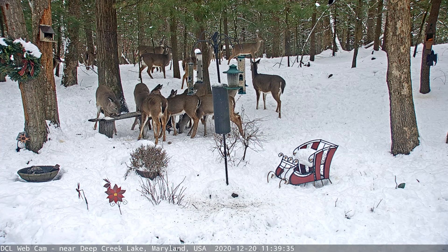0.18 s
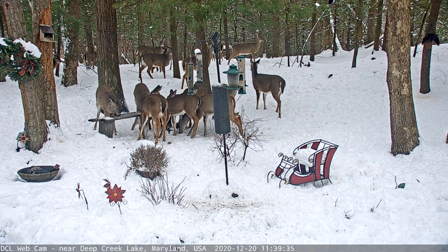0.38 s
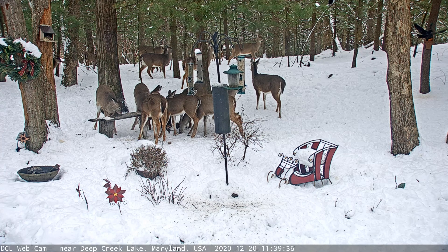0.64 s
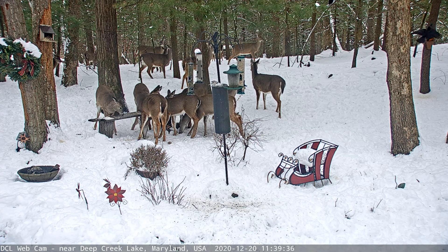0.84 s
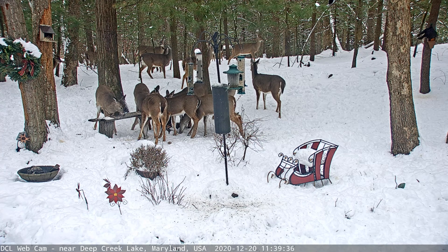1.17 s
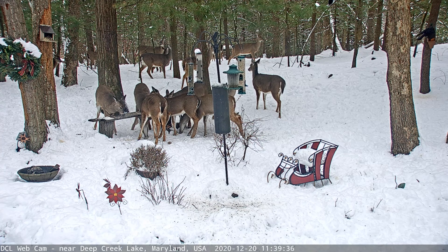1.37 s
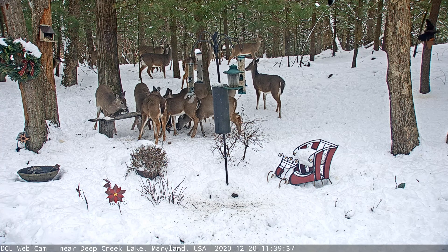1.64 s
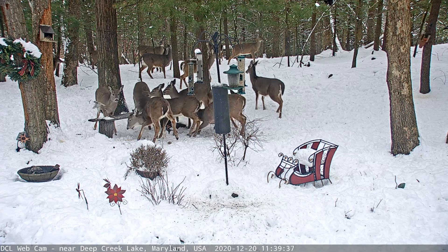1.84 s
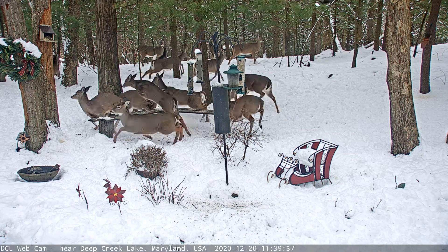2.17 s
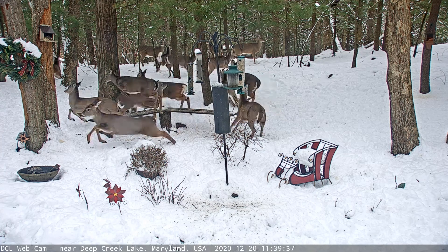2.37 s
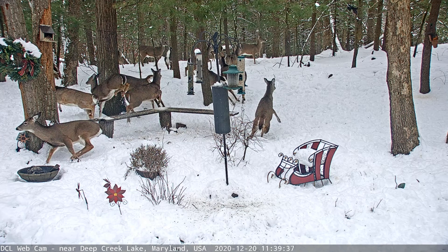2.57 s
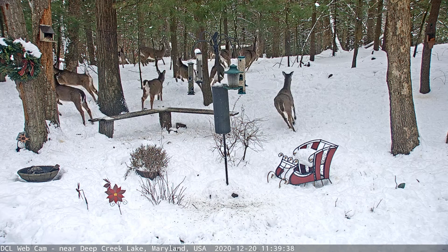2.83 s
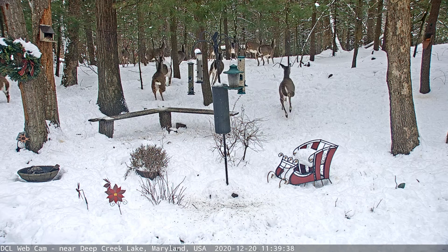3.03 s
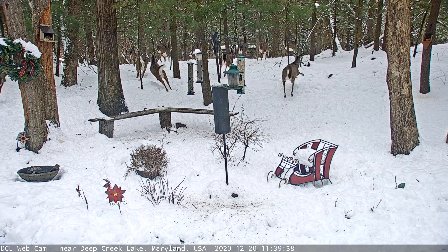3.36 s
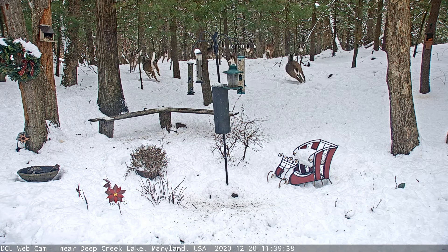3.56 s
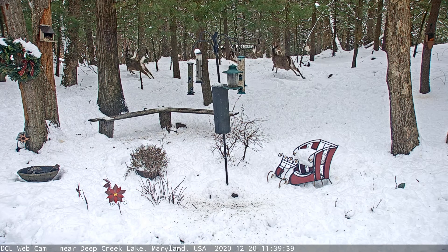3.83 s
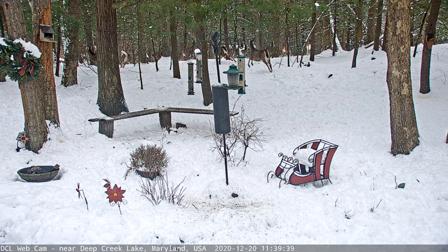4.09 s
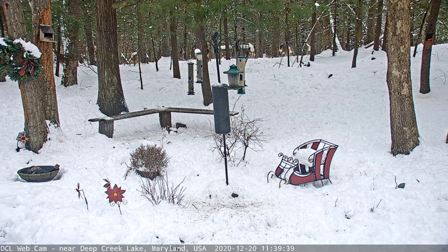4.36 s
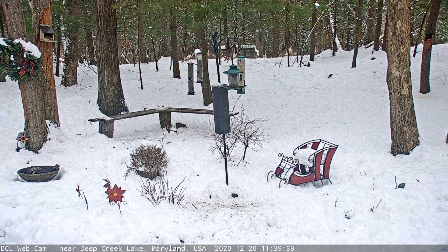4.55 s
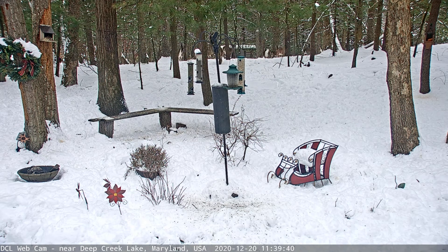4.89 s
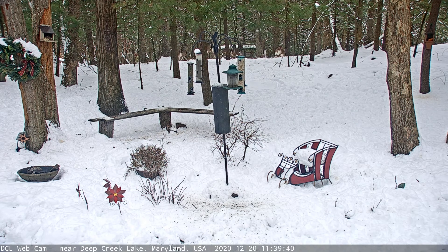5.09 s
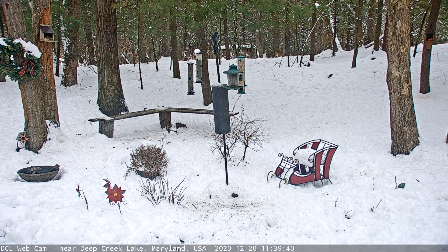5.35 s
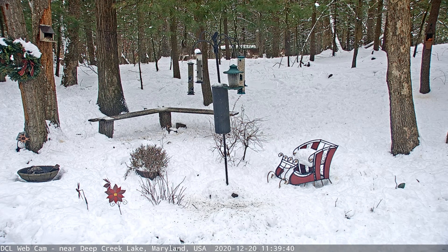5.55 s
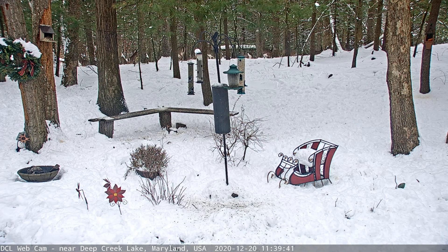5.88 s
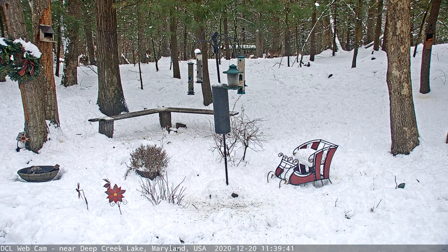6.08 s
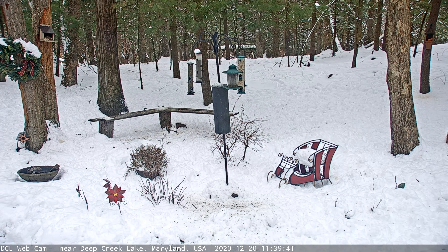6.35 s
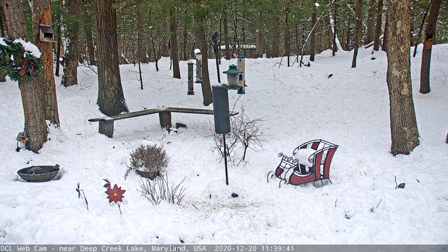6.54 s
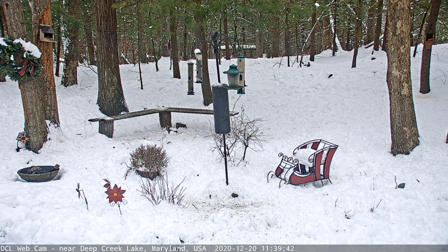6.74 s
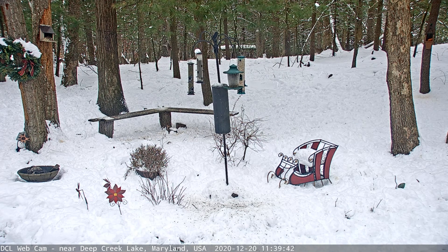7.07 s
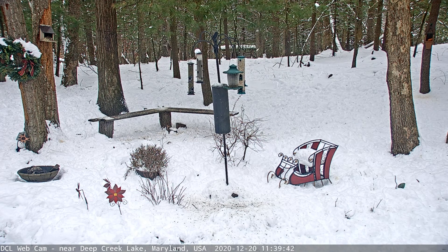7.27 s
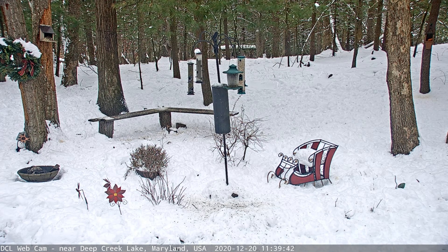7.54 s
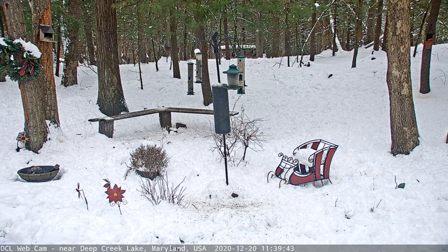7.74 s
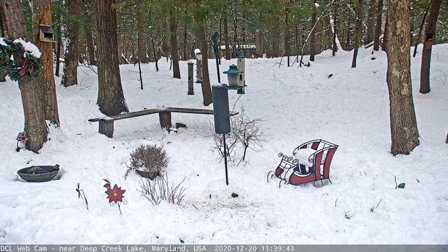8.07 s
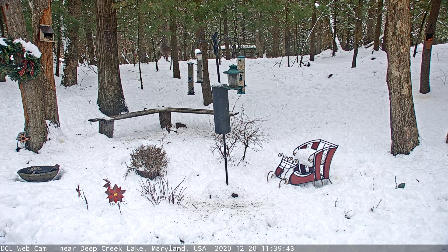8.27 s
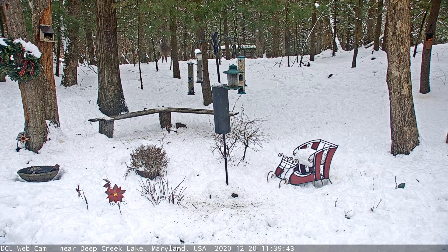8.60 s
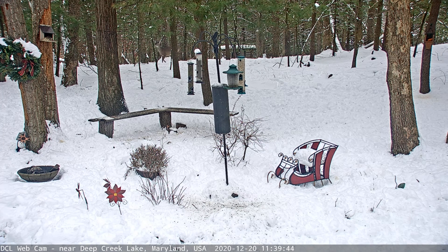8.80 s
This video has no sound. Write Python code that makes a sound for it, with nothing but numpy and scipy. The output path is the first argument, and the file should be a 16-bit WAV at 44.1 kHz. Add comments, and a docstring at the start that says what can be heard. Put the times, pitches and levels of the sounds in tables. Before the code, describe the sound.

Quiet winter air and one hoarse bird chip, then roof snow and ice break loose with a crack, scrape down and crash, overloading the microphone.

```python
"""A sheet of snow and ice breaks loose, scrapes down a roof and crashes to the ground beside an outdoor camera.
Loose snow sifts after it, lumps of ice shatter one by one and a smaller slab follows; a bird chips once before.
Noise with drawn loudness curves makes the scraping, sifting, thumping and booming; each lump is a burst of
noise with a short pitched tick, and the bird is two gliding tones with a rasp.
Quiet winter air lies under it all, and the camera's sound overloads in the crash."""
import sys
import numpy as np
from scipy import signal
from scipy.fft import rfft, irfft, next_fast_len
from scipy.io import wavfile
from scipy.ndimage import uniform_filter1d, map_coordinates

SR = 44100
rng = np.random.default_rng(int(sys.argv[2]) if len(sys.argv) > 2 else 0)


def dump_mix(stems):
    """Bounce the given channels to the path in sys.argv[1] as a 16-bit WAV at rate SR."""
    frames = np.atleast_2d(stems).T  # one column per channel
    limited = np.clip(frames, -1, 1)  # hard clip at full scale
    pcm = np.round(limited * 32767).astype(np.int16)
    wavfile.write(sys.argv[1], SR, pcm)


N = 393372

# Tone colour of bursting ice and snow. Each row: frequency in Hz, relative level in dB per Hz.
SPRAY_COLOUR = [(180, -32.5), (300, -25), (398, -29), (514, -28), (693, -17.5), (1720, -17), (3300, -10),
                (5340, -3), (6890, 2), (8900, -16.5), (11600, -55), (19600, -120)]
# Tone colour of the ground when struck. Each row: frequency in Hz, relative level in dB per Hz.
GROUND_COLOUR = [(60, -39.5), (90, 1), (130, 0.5), (200, -1.5), (280, -13.5), (500, -95.5)]
# Loudness of the shattering and sifting snow. Each row: time in seconds, level in dB.
SIFT_LEVELS = [(1.4, -59), (1.49, -34.5), (1.56, -52.5), (1.68, -33), (2.09, -19.5), (2.3, -35),
               (2.55, -10.5), (3.24, -8.5), (3.7, -9.5), (4.2, -21), (5.0, -40.5), (6.13, -47.5),
               (6.26, -28.5), (6.39, -27.5), (6.51, -48), (6.58, -31), (6.92, -26), (7.07, -42.5),
               (7.66, -60.5), (8.92, -63)]


def amp(db):
    """Turn decibels into a plain gain."""
    return 10 ** (np.asarray(db) / 20)


def unit(x):
    """Scale x to an rms of 1."""
    return x / np.sqrt(np.mean(x ** 2) + 1e-20)


def along(points, hz):
    """Read a curve of (Hz, value) points on a log frequency axis."""
    f, v = np.transpose(points)
    return np.interp(np.log(hz + 1), np.log(f + 1), v)


def curves(rows, outside=-120):
    """Draw one value per sample for each column after the time."""
    s, *columns = np.transpose(rows)
    t = np.arange(N) / SR
    return [np.interp(t, s, column, outside, outside) for column in columns]


def wobble(rate):
    """Draw a smooth random curve with rate knots a second."""
    knots = rng.standard_normal(int(N * rate / SR) + 4)
    return map_coordinates(knots, [np.arange(N) * rate / SR])


def filtered(x, response):
    """Multiply the spectrum of x by a response, which may be complex."""
    m = next_fast_len(N + SR // 2)
    hz = np.fft.rfftfreq(m, 1 / SR)
    return irfft(rfft(x, m) * response(hz), m)[..., :N]


def coloured(x, spectrum):
    """Give x a tone colour; white noise of rms 1 keeps an rms of 1."""
    hz = np.linspace(0, SR / 2, num=20000)
    norm = np.sqrt(np.mean(amp(along(spectrum, hz)) ** 2))
    return filtered(x, lambda hz: amp(along(spectrum, hz)) / norm)


def grit(spiky_db, patchy_db):
    """Make noise of rms 1 from unequal grains, with patches of random gain over time and pitch."""
    grains = rng.standard_normal(N) * amp(spiky_db * rng.exponential(size=N))
    z = signal.stft(grains, nperseg=256)[2]
    field = uniform_filter1d(rng.standard_normal(z.shape), size=6, axis=0)  # smooth over pitch
    field = uniform_filter1d(field, size=8, axis=1)  # smooth over time
    patchy = signal.istft(z * amp(patchy_db * unit(field)), nperseg=256)[1]
    return unit(patchy[:N])


def air():
    """Winter air over a low hum: steady noise, strongest in the bass."""
    # Tone colour of the quiet. Each row: frequency in Hz, relative level in dB per Hz.
    quiet_colour = [(12, -50), (20, -9), (65, -5), (92, -23), (179, -28), (461, -33), (498, -33.5),
                    (580, -33.5), (659, -35.5), (896, -35), (1880, -41.5), (6720, -41.5), (8900, -61.5),
                    (11600, -99), (19600, -120)]
    return amp(-44.5) * coloured(rng.standard_normal(N), quiet_colour)


def roof(x):
    """Ring the roof panels as resonances; white noise of rms 1 comes out at rms 1."""
    # The panels. Each row: pitch in Hz, width of the resonance in Hz, relative level in dB.
    panels = [(278, 84, -0.5), (393, 128, -1.5), (746, 152, -8), (908, 119, -6.5), (1342, 308, -7),
              (1548, 510, -8), (2560, 580, -14.5), (4350, 2000, -18), (6910, 720, -13.5)]

    def modes(f):
        total = 0
        for k, (centre, width, db) in enumerate(panels):
            resonance = 1j * f * width / (centre * centre - f * f + 1j * f * width)
            total = total + (-1) ** k * amp(db) * resonance  # neighbours swing in opposite directions
        return total

    norm = np.sqrt(np.mean(np.abs(modes(np.linspace(0, SR / 2, num=20000))) ** 2))
    return filtered(x, modes) / norm


def crumbs():
    """Small lumps at random moments, their loudness following the sifting snow."""
    # One row: level over the snow in dB, size scatter in dB, thud and knock in dB against the crack.
    crumb_levels = (-1, 2.2, -22, -25)
    per_second = 18
    when, size, pitch = rng.random((int(per_second * N / SR), 3)).T
    over_db, scatter_db, thud_db, knock_db = crumb_levels
    snow_db = curves(SIFT_LEVELS)[0][(when * N).astype(int)]
    db = snow_db + over_db - scatter_db * np.log(size + 1e-3)  # a few are much louder
    tick_hz = np.interp(pitch, [0, 1], (4500, 7200))
    rows = zip(when * N / SR, db, tick_hz)
    t60 = .04  # s
    return [(s, level, thud_db, knock_db, hz, t60) for s, level, hz in rows if level > -70]


def lumps():
    """Each lump ticks at its own pitch, bursts, knocks on other ice, thuds on the roof and shakes the ground."""
    # The lumps of ice that stand out. Each row: start in seconds, crack level in dB,
    # thud in dB against the crack, knock in dB against the crack, tick pitch in Hz,
    # time in seconds for the crack to die by 60 dB.
    big_lumps = [(0.3416, -54, -12, 4, 6100, .04), (0.452, -41, -20, -32, 6230, .036),
                 (0.537, -42, -28, -28, 7500, 0.15), (0.8066, -46, -25, -35, 4840, .05),
                 (1.3814, -19, 1, -23, 6000, .05), (1.4027, -30, 6, -18, 4900, .054),
                 (1.4252, -24, -1.5, -17, 6950, 0.091), (1.4515, -17, 1, -22, 5830, 0.041),
                 (1.4686, -14, -9, -28, 6050, 0.043), (1.489, -13.5, -3.5, -34, 6440, 0.056),
                 (1.5172, -20.5, 3, -36, 4770, 0.05), (1.5593, -20.5, -6, -11.5, 6330, 0.062),
                 (1.6748, -26.5, -5, -33, 6940, 0.096), (1.74, -24, -21, -7, 6300, 0.072),
                 (1.7702, -19.5, -23.5, -14, 6440, 0.06), (1.833, -19.5, -24.5, -32, 4560, .036),
                 (1.868, -13, -19, -11, 4810, 0.045), (1.925, -10, -13, -34, 6570, 0.14),
                 (1.965, -11.5, -20, -7, 6870, 0.081), (2.0156, -11.5, -10.5, -7.5, 5950, 0.068),
                 (2.059, -13.5, -8.5, -9, 7350, 0.078), (2.0807, -10.5, -13.5, -6.5, 6490, 0.11),
                 (2.1053, -11, -25, -23, 6750, .065), (2.125, -12, -13, -7, 6820, .042),
                 (2.2059, -10.5, -26.5, -37, 7000, 0.05), (2.2205, -17, -4, -25.5, 6540, 0.047),
                 (2.2375, -25.5, 14, -19.5, 6400, 0.042), (2.2914, -23, 12, -22, 6350, 0.045),
                 (3.87, -24, 12, -5, 6500, .05), (3.9884, -10, -28.5, -49, 5450, 0.065),
                 (4.2288, -8.5, -23.5, -37, 5410, 0.046), (4.3724, -17, -22, -31, 6370, .028),
                 (4.415, -19.5, -26, -27, 4900, 0.057), (4.4584, -23, -4.5, -21, 6150, .065),
                 (4.5216, -18, -26.5, -23, 5150, 0.043), (4.481, -36, 8, -8, 6000, 0.045),
                 (4.61, -32, -8, -1, 6900, 0.033), (4.6339, -29.5, 2, 1.5, 5430, 0.053),
                 (4.6618, -25.5, -6, -30, 4080, 0.047), (4.8384, -27, -5, -33, 6330, 0.074),
                 (4.9138, -32, -9, -9, 7000, 0.091), (5.0844, -38, 9, -3, 6360, 0.091),
                 (5.178, -36, 9, -19, 6940, 0.078), (5.21, -44.5, 13, -15, 6500, 0.028),
                 (5.3642, -35.5, -18.5, -35, 7040, .035), (5.3935, -25, -29, -44, 7000, 0.018),
                 (5.808, -35, -12.5, -32, 5530, .064), (6.0782, -45.5, 16, -20, 4830, 0.058),
                 (6.126, -23, 2.5, -29, 6240, .04), (6.1709, -17.5, -5.5, -30.5, 6570, .05),
                 (6.2694, -14.5, -15, -30, 7030, 0.064), (6.3714, -17.5, 2, -28, 6970, 0.052),
                 (6.4544, -30.5, 7.5, -9.5, 7100, 0.053), (6.5297, -29, -19, -25, 6910, .05),
                 (6.5608, -19.5, -21, -10.5, 6060, 0.041), (6.58, -15, -26, -18, 5420, 0.072),
                 (6.631, -18, -31.5, -29, 5540, 0.059), (6.6707, -13.5, -32, -33, 6780, .05),
                 (6.6972, -19, -21.5, -29, 5870, 0.086), (6.8359, -20, -18, -33, 4850, 0.047),
                 (6.872, -21, -8.5, -35, 4930, .043), (6.889, -16.5, -19, -37, 5280, 0.061),
                 (6.9382, -18, -32, -29, 5150, .033), (6.9602, -17, -33, -29, 4550, 0.034),
                 (6.987, -17, -25.5, -31, 6170, 0.1), (7.0208, -24, -34, -30, 6500, .05),
                 (7.0878, -19, -8.5, -4.5, 7240, .04), (7.1203, -21, -23, -31, 6880, 0.067),
                 (7.1538, -23, -27, -36, 5550, .076), (7.1677, -26, -39, -23, 6500, .048),
                 (7.218, -40, -22, -27, 6570, .04), (7.2789, -33, -23, -20, 6300, 0.044),
                 (7.2898, -40, -25, -29, 6900, .06), (7.3388, -33.5, -25, -23, 6300, .06),
                 (7.3642, -42, -20, -32, 7150, .04), (7.417, -38.5, -24, -28, 7200, 0.045),
                 (7.45, -31, -26, -17, 3500, 0.076), (7.535, -38.5, -20, -18, 7120, 0.066)]
    # Tone colour of hard ice on hard ice. Each row: frequency in Hz, relative level in dB per Hz.
    knock_colour = [(500, -56), (1200, -1), (2500, -5.5), (3800, -3), (6000, -36), (9000, -66.5)]
    crack_rise_s, thud_rise_s = 0.00058, 0.0024
    tick_t60_s, land_t60_s = 0.033, .1
    thud_lasts = 1.3  # times as long as the crack
    tick_db, land_db = 2.4, -6  # tick against the crack; ground against the thud

    t = np.arange(SR // 8) / SR
    dying = lambda t60: amp(-60 * t / t60)
    sharp, soft = 1 - np.exp(-t / crack_rise_s), 1 - np.exp(-t / thud_rise_s)
    land, tick = soft * dying(land_t60_s), dying(tick_t60_s)
    parts, ticks = np.zeros((4, N + SR)), np.zeros(N + SR)
    for s, db, thud_db, knock_db, hz, t60 in list(big_lumps) + crumbs():
        burst = sharp * dying(t60)
        shapes = np.array([burst, burst, soft * dying(thud_lasts * t60), land])
        levels = db + np.array([[0], [knock_db], [thud_db], [thud_db + land_db]])
        start = round(s * SR)
        parts[:, start:start + len(t)] += shapes * amp(levels)
        ticks[start:start + len(t)] += amp(db + tick_db) * tick * np.sin(2 * np.pi * hz * t)

    crack, knock, thud, ground = parts[:, :N]
    cracks = coloured(crack * grit(spiky_db=2.5, patchy_db=3.0), SPRAY_COLOUR)
    knocks = coloured(knock * rng.standard_normal(N), knock_colour)
    thuds = roof(thud * rng.standard_normal(N))
    landings = coloured(ground * rng.standard_normal(N), GROUND_COLOUR)
    return ticks[:N] + cracks + knocks + thuds + landings


def trees(x):
    """The trunks scatter a soft tail: fading noise in which each frequency dies at its own speed."""
    # How long the tail rings. Each row: frequency in Hz, time in seconds to die by 60 dB.
    tail_times = [(300, .25), (3000, 0.14), (8000, 0.4)]
    hz, t, z = signal.stft(rng.standard_normal(SR // 2), SR, nperseg=256)
    fading = amp(-60 * t / along(tail_times, hz)[:, None])
    tail = signal.istft(z * fading, SR, nperseg=256)[1]
    delayed = np.pad(x, (600, 0))  # samples
    return signal.fftconvolve(delayed, tail / np.linalg.norm(tail))[:N]


def bird():
    """One hoarse chip of two voices that bends up and falls steeply, the first voice beating fast."""
    # The chip. Each row: time in seconds, pitch in Hz, level in dB (raised below for the first voice),
    # second voice's level in dB (raised below for the rasp).
    chip = [(.826, 4320, -52, -59), (.834, 4670, -35, -33), (.843, 5140, -20.5, -27.5),
            (.849, 6330, -21, -26), (.855, 6970, -16, -53), (.859, 6860, -16, -60), (.863, 5200, -22, -60),
            (.868, 3500, -48, -63), (.874, 2400, -73, -62)]
    hz, db, second_db = curves(chip)
    shaky_hz = np.clip(hz, 0, None) * (1 + 0.01 * wobble(900))
    phase = 2 * np.pi * np.cumsum(shaky_hz) / SR
    beat = 1 + 0.68 * np.sin(2 * np.pi * 210 * np.arange(N) / SR)
    first = amp(db + 2.0) * beat * np.sin(phase)
    second = amp(second_db) * np.sin(1.3 * phase)
    hiss = coloured(rng.standard_normal(N), SPRAY_COLOUR)
    bright_hiss = filtered(hiss, lambda f: 1 / (1 + (3500 / (f + 1)) ** 6))  # mostly the part above 3500 Hz
    return first + second + amp(second_db + 3.0) * bright_hiss


def thump():
    """Snow thumps on the ground: low noise with an unsteady level."""
    # Loudness of the thumps. Each row: time in seconds, level in dB before the wobble.
    thump_levels = [(1.3, -57), (1.34, -5), (1.4, -20.5), (1.68, -40.5), (1.89, -58), (1.94, -27),
                    (2.23, -45), (2.24, -11.5), (2.262, -25), (2.31, -15.5), (2.45, -9), (3.24, -10.5),
                    (3.4, -14), (3.85, -21), (4.2, -30), (4.56, -53), (5.1, -55), (5.19, -28.5),
                    (5.28, -52.5), (6.1, -51.5), (6.17, -28), (6.39, -35), (6.51, -54.5), (7.2, -60)]
    level = amp(curves(thump_levels)[0] + 1.5 * wobble(12))
    return level * coloured(rng.standard_normal(N), GROUND_COLOUR)


def jolt():
    """The sheet tears free: noise cracks through the roof, the frame rings as dying tones, a panel squeaks."""
    # The first break of the sheet. Each row: time in seconds, level in dB.
    break_levels = [(1.308, -47), (1.322, -21), (1.328, -1), (1.342, -7), (1.352, -15.5), (1.37, -22)]
    # Rafters and panels struck by the break. Each row: pitch in Hz, level in dB, time in seconds to die by 60 dB.
    struck_frame = [(19, 2.5, 0.5), (241.5, -11, 0.31), (284.4, -11, 0.7), (400, -17, .5), (1330, -26, .6),
                    (1372, -26, .6)]
    # The loosened sheet rubs one panel. Each row: time in seconds, level in dB.
    squeak_levels = [(1.6, -60), (1.615, -40), (1.64, -38), (1.66, -67)]
    # Tone colour of that panel. Each row: frequency in Hz, relative level in dB per Hz.
    panel_colour = [(1100, -49.5), (1500, -6), (1630, 1), (1800, -8), (2400, -50.5)]
    crack = roof(amp(curves(break_levels)[0]) * rng.standard_normal(N))
    t = np.clip(np.arange(N) / SR - 1.336, 0, None)  # seconds since the frame was struck
    swing = sum(-amp(db - 60 * t / t60) * np.sin(2 * np.pi * hz * t) for hz, db, t60 in struck_frame)
    squeak = amp(curves(squeak_levels)[0]) * coloured(rng.standard_normal(N), panel_colour)
    return crack + swing + squeak


def boom():
    """The shaken building booms: very deep noise that swells and sinks."""
    # Loudness of the boom. Each row: time in seconds, level in dB before the wobble.
    boom_levels = [(1.33, -35), (1.4, -17), (1.49, -17), (1.53, -30), (1.73, -16), (1.89, -34), (2.5, -18),
                   (3.24, -18), (3.36, -11), (3.7, -18), (3.85, -12), (4.11, -23), (4.2, -17), (4.56, -31),
                   (5.0, -43), (5.19, -26), (6.04, -43), (6.17, -21), (6.32, -23), (6.58, -44), (6.79, -33),
                   (7.0, -36), (7.3, -42), (7.4, -56)]
    # Tone colour of the building. Each row: frequency in Hz, relative level in dB per Hz.
    boom_colour = [(11, -31), (18, -1.5), (48, -1), (100, -18.5), (130, -43.5), (220, -120)]
    level = amp(curves(boom_levels)[0] + 2.5 * wobble(9.4))
    return level * coloured(rng.standard_normal(N), boom_colour)


def scrape(jerks):
    """The sheet grinds over the roof in jerks: gritty noise rings the panels."""
    # The sheet jerks loose, runs and trails off, then a smaller slab.
    # Each row: time in seconds, level in dB before the jerks.
    scrape_levels = [(1.37, -38), (1.385, -19), (1.49, -25), (1.52, -17.5), (1.56, -38.5), (1.68, -32.5),
                     (1.73, -68.5), (1.9, -46), (2.09, -30.5), (2.17, -46), (2.262, -35), (2.275, -18),
                     (2.39, -8.5), (2.51, -4), (3.43, -2.5), (3.57, -13.5), (3.7, -6), (3.87, -13),
                     (3.92, -32), (4.2, -36.5), (4.73, -54), (6.1, -53), (6.13, -19.5), (6.17, -15.5),
                     (6.24, -19), (6.28, -15.5), (6.33, -23.5), (6.39, -20), (6.51, -48.5), (7.3, -65)]
    level = amp(curves(scrape_levels)[0] + 1.1 * jerks + 0.84 * wobble(14))
    return roof(level * grit(spiky_db=3.0, patchy_db=1.5))


def spray(jerks):
    """Snow shatters and sifts down: bright gritty noise that flutters and shares the sheet's jerks."""
    level = amp(curves(SIFT_LEVELS)[0] + 0.27 * jerks + 1.1 * wobble(90))
    return coloured(level * grit(spiky_db=2.5, patchy_db=1.3), SPRAY_COLOUR)


def scene():
    """Add up all sources, with a soft tail from the trees behind the ice and the bird."""
    ice, chip = lumps(), bird()
    tail = trees(amp(-20.0) * ice + amp(-16) * chip)
    jerks = wobble(45)
    slide = thump() + jolt() + boom() + scrape(jerks) + spray(jerks)
    return (air() + ice + tail + chip + slide)[None]


def record(dry):
    """The sound is cut steeply above 9 kHz before it clips hard; then the treble is dulled and peaks rounded."""
    # Tone of the camera after the overload. Each row: frequency in Hz, gain in dB (capped at 0 below).
    camera_tone = [(20, 6.5), (7300, -2.5), (8300, -11.5), (9200, -12.5), (16000, -15.5)]
    treble_cut_hz, top_hz = 9100, 15830
    clip_at, ceiling = .72, .8  # of full scale
    heard = filtered(dry, lambda hz: 1 / (1 + (hz / treble_cut_hz) ** 90))
    clipped = heard / (1 + np.abs(heard / clip_at) ** 14) ** (1 / 14)
    # Clipping adds sharp edges in the treble; little of them passes.
    dulled = filtered(clipped, lambda hz: amp(np.minimum(along(camera_tone, hz), 0)))
    rounded = dulled / (1 + np.abs(dulled / ceiling) ** 12) ** (1 / 12)
    return filtered(rounded, lambda hz: hz < top_hz)


dry = scene()
out = record(dry)
dump_mix(out)
```